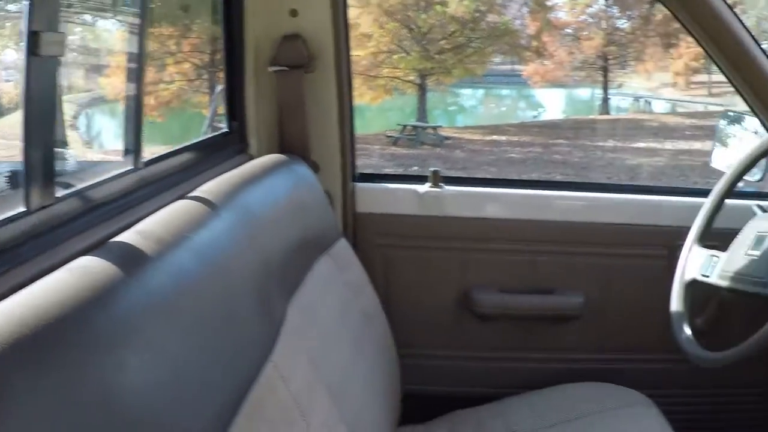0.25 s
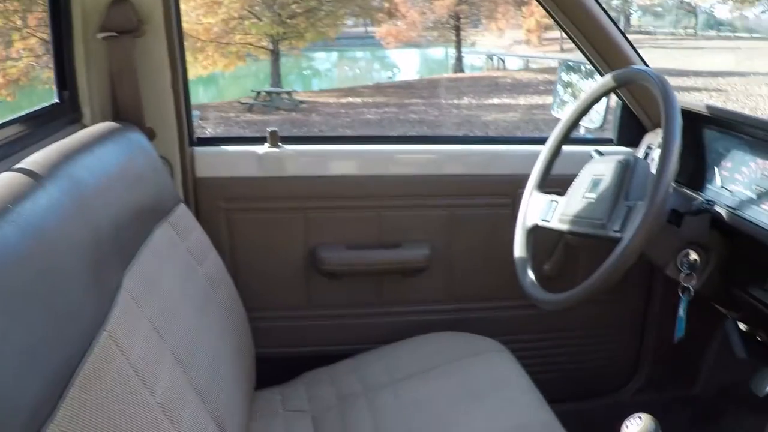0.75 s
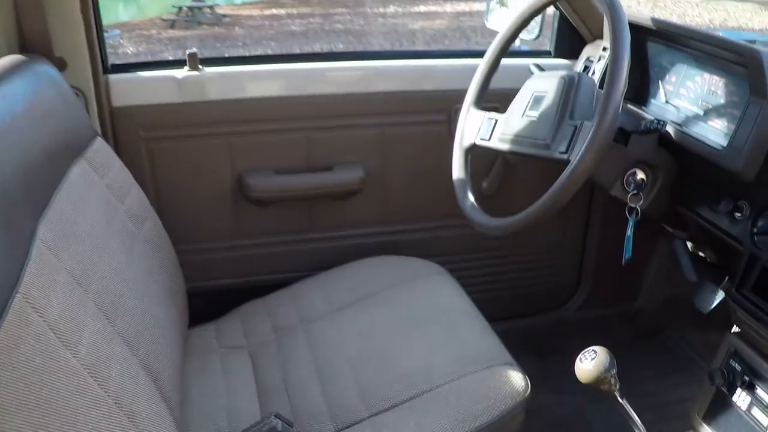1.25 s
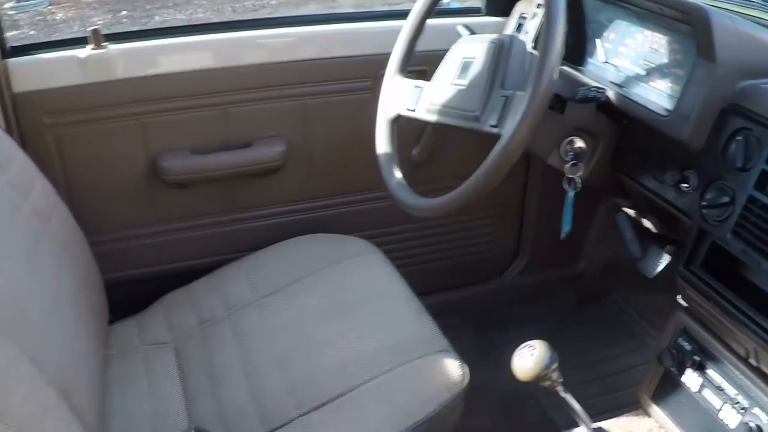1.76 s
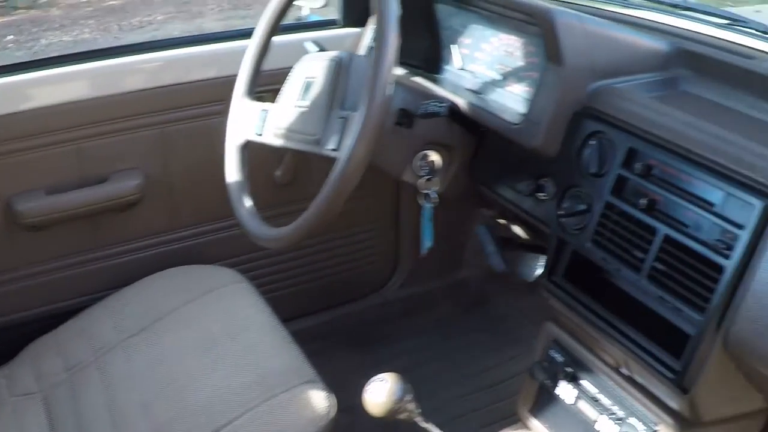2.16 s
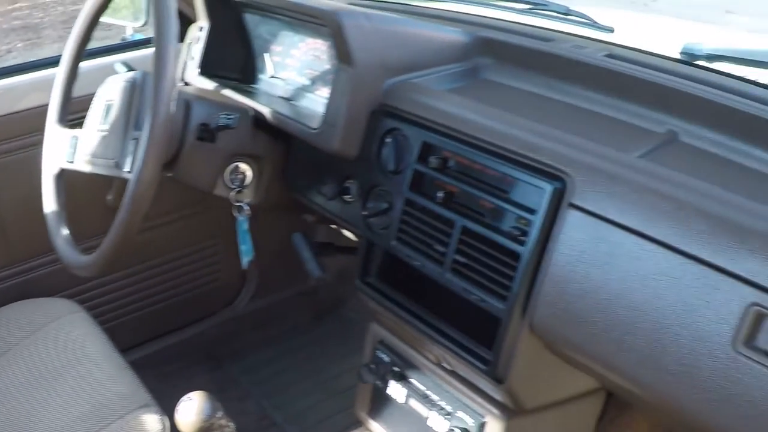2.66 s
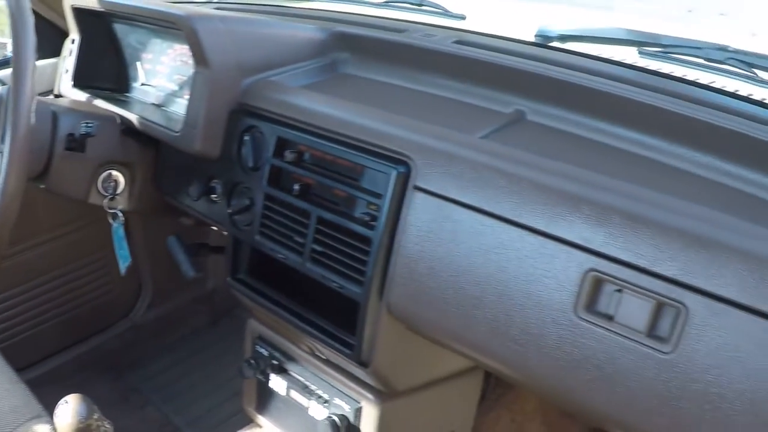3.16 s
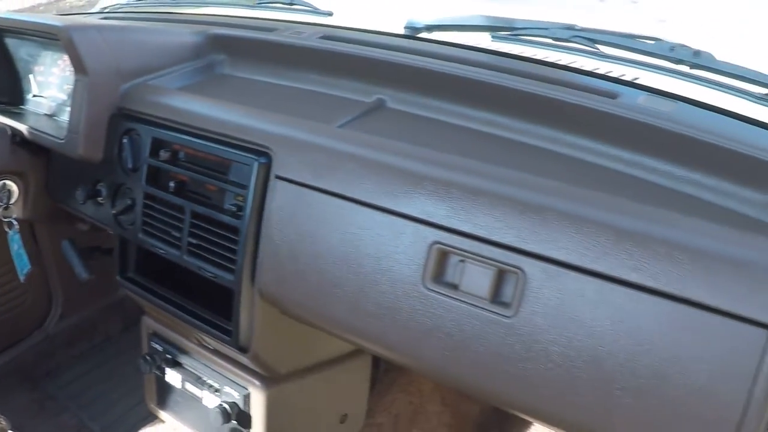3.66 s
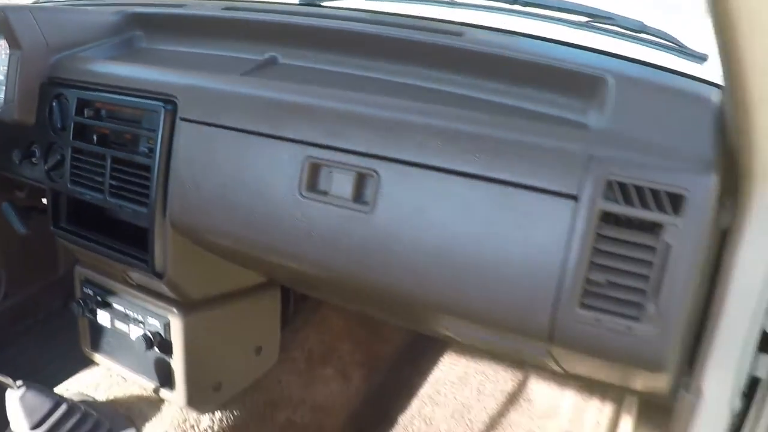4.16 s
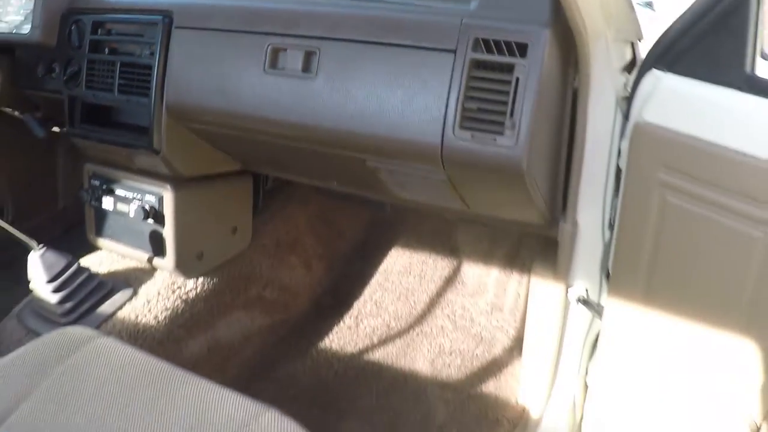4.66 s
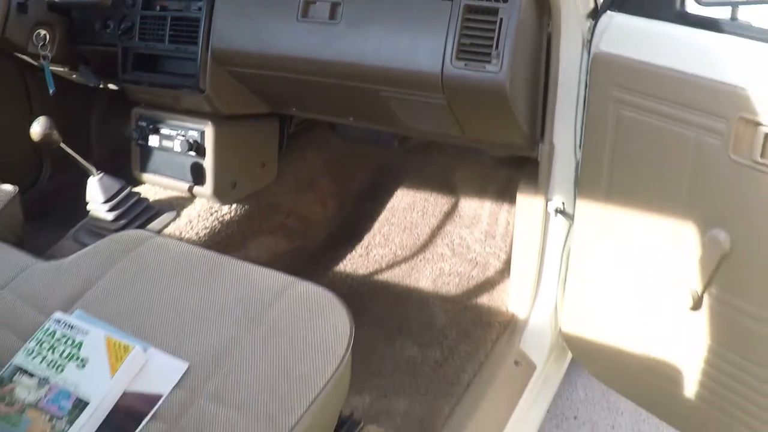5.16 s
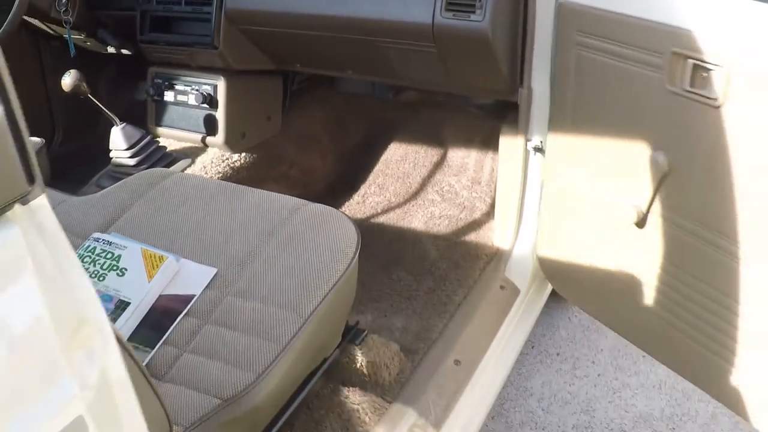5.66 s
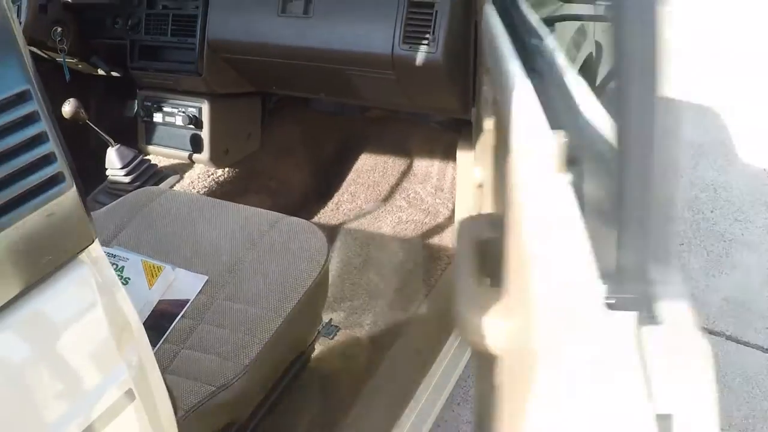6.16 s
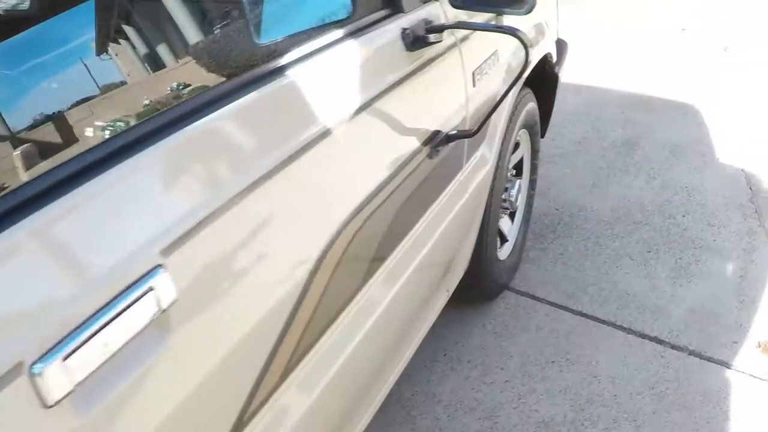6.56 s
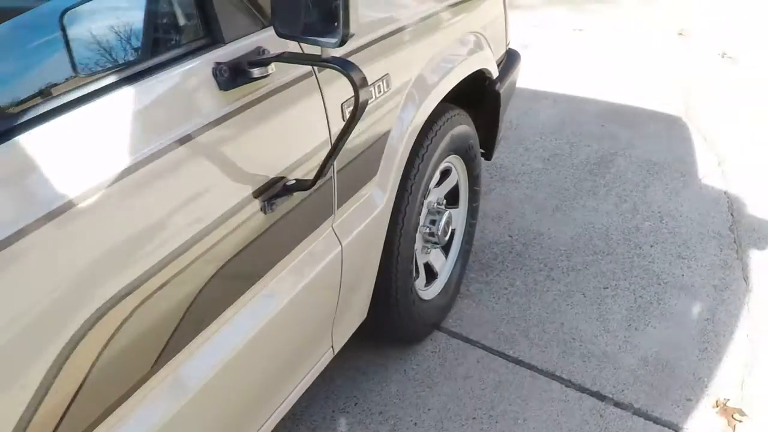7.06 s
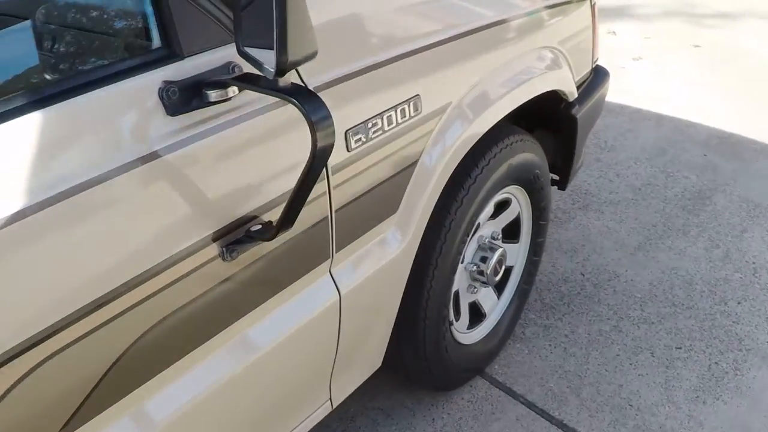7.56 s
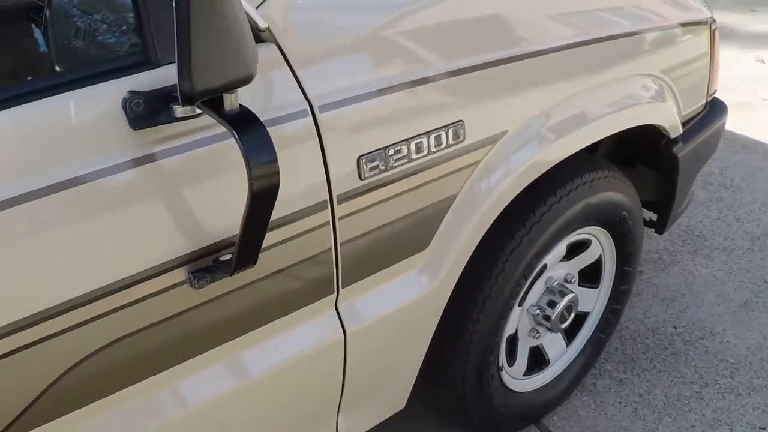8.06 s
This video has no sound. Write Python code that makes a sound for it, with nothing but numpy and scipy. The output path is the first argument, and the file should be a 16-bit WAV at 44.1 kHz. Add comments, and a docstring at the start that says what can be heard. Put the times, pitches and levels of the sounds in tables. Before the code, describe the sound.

Inside a small pickup's cab, a four-cylinder engine idles evenly with a deep droning boom and muted valve clatter. A couple of faint cloth scuffs pass. As the handheld microphone moves out the open door, wind thumps and crackles on it. The steel door slams with a sharp, loud bang and low thump; the sound ducks, then the idle returns outside, less boomy, with clearer ticking clatter.

```python
"""A four-cylinder pickup idles: its crank phase drives a firing note that booms in the open cab,
higher orders, block noise and valve clatter. Air buffets the microphone as it moves out past the seat:
noise follows the gusts, pulses mark swirls and eddies. A steel door slams in contact cracks, decaying
noise, short tones and a thump. The bang turns the gain down; it recovers on the idle by the front wheel."""
import sys
import numpy as np
from scipy import signal
from scipy.fft import rfft, irfft, next_fast_len
from scipy.io import wavfile
from scipy.ndimage import uniform_filter1d, minimum_filter1d, map_coordinates

SR = 44100
rng = np.random.default_rng(int(sys.argv[2]) if len(sys.argv) > 2 else 0)


def unload_wav(signal):
    """Save mono or channel-first audio to the path in sys.argv[1] as 16-bit WAV at rate SR, clipped to [-1, 1]."""
    wavfile.write(
        sys.argv[1],
        SR,
        np.round(np.clip(np.atleast_2d(signal).T, -1, 1) * 32767).astype(np.int16),
    )


N = 366912

# the microphone's path out through the door to the front wheel: t/s, position (0 in the cab - 1 outside)
OUTSIDE = [(0, 0.053), (2.9, 0.034), (4.1, 0.31), (5, 0.63), (6.4, 0.68), (7.8, 0.97)]
# gusts on the microphone: start t/s, length/s, flow level/dB, stray eddy rate/(1/s)
GUSTS = [(5.199, .14, -14, 18), (5.52, .1, -17.5, 20), (5.645, 0.14, -17.5, 50), (5.81, .17, -17.5, 40),
         (6.03, .09, -19, 0), (6.209, .17, -14.5, 0), (6.788, .12, -23.5, 0), (7.09, .26, -27.5, 0),
         (7.755, .1, -25.5, 0), (8.09, .18, -28.5, 0)]
# the door closes the cab at SHUT_S; the cab's sound dies behind it over SEAL_S
SHUT_S, SEAL_S = 6.401, 0.19  # s


def amp(db):
    """Level: an amplitude ratio is ten to the power of a twentieth of the decibels."""
    return 10 ** (np.asarray(db) / 20)


def unit(x):
    """Normalization: a signal divided by its root mean square has rms 1."""
    return x / np.sqrt(np.mean(x ** 2) + 1e-20)


def along(points, hz):
    """Logarithmic frequency scale: (Hz, value) points are joined linearly in log frequency."""
    f, v = np.transpose(points)
    return np.interp(np.log(hz + 1), np.log(f + 1), v)


def curves(rows):
    """Linear interpolation: each column after the time gives one value per sample."""
    s, *cols = np.transpose(rows)
    return [np.interp(np.arange(N) / SR, s, c) for c in cols]


def ramp(s, length):
    """Linear transition: 0 until time s, rising to 1 over length seconds."""
    return np.clip((np.arange(N) / SR - s) / length, 0, 1)


def wobble(rate):
    """Band-limited fluctuation: a smooth curve runs through rate random knots a second."""
    coarse = np.arange(0, N + 64, 64)
    knots = rng.standard_normal(int(N * rate / SR) + 4)
    smooth = map_coordinates(knots, [coarse * rate / SR])
    return np.interp(np.arange(N), coarse, smooth)


def filtered(x, response):
    """Linear filtering: the spectrum is multiplied by a response of frequency."""
    m = next_fast_len(len(x) + 8192)
    return irfft(rfft(x, m) * response(np.fft.rfftfreq(m, 1 / SR)), m)[:len(x)]


def coloured(x, spectrum):
    """Spectral shaping: x is weighted by (Hz, dB) points and brought to rms 1."""
    return unit(filtered(x, lambda hz: amp(along(spectrum, hz))))


def band(count, centre_hz, width_hz):
    """Resonance: noise is weighted by a symmetric peak, width_hz wide at half amplitude, at rms 1."""
    def peak(hz):
        detuning = (hz - centre_hz ** 2 / (hz + 1)) / width_hz
        return 1 / (1 + detuning ** 2)

    return unit(filtered(rng.standard_normal(count), peak))


def add(track, s, sound):
    """Superposition: a sound is summed into the track at time s."""
    part = track[round(s * SR):][:len(sound)]
    part += sound[:len(part)]


def window_hiss():
    """Broadband noise: outdoor hiss at the rear window fades as the microphone turns to the dashboard."""
    # outdoor spectrum: f/Hz, relative level/dB
    hiss_spectrum = [(500, -31), (1500, 3.5), (5000, -4), (8000, -11.5), (12500, -14), (15300, -19)]
    start_db, fade_s = -53.5, 0.73
    fade = np.exp(-(np.arange(N) / SR / fade_s) ** 2)
    return amp(start_db) * fade * coloured(rng.standard_normal(N), hiss_spectrum)


def wind():
    """Turbulent pressure: noise on the microphone follows gusts that rise, hold and die over a breeze."""
    # buffeting spectrum: f/Hz, relative level/dB
    buffet_spectrum = [(10, -13.5), (25, 1), (50, 2.5), (100, -3), (170, -10.5), (260, -19.5), (450, -27.5),
                       (900, -63.5), (2500, -120)]
    breeze_db = -35  # light air at position 1, outside
    attack_s, release_s = 0.028, 0.03  # exponential time constants
    t = np.arange(N) / SR
    flow = amp(breeze_db) * curves(OUTSIDE)[0] ** 2
    for s, length, db, _ in GUSTS:
        early, late = np.maximum(s - t, 0), np.maximum(t - s - length, 0)
        gust = amp(db) * np.exp(-early / attack_s - late / release_s)
        flow = np.maximum(flow, gust)
    return flow * amp(2.05 * wobble(25)) * coloured(rng.standard_normal(N), buffet_spectrum)


def puffs():
    """Pressure pulse: each slow swirl gives one low thud with opposite-signed lobes before and after."""
    # slow swirls: t/s, peak level/dB
    swirls = [(5.219, -10), (5.252, -9), (5.601, -4), (5.637, -9), (5.760, -6.5), (6.251, -6), (6.352, -8)]
    pulse_s = 0.0048  # Gaussian time scale
    out = np.zeros(N)
    t = np.arange(-SR // 20, SR // 20) / SR
    u = (t / pulse_s) ** 2
    for s, db in swirls:
        add(out, s + t[0], amp(db) * (2 * u - 1) * np.exp(-u))
    return out


def eddy(db, wake_s):
    """Impulsive turbulence: a pressure jolt 5 ms in leads a decaying noise wake, scaled to peak at db."""
    # spectrum of an eddy peaking at 0 dB: f/Hz, relative level/dB
    eddy_spectrum = [(35, -19), (130, -1), (260, 2), (480, -5.5), (840, -15), (1200, -25), (1800, -39),
                     (3000, -55), (6000, -120)]
    jolt_db, db_per_octave = 20, 40  # jolt over wake; a stronger eddy is also brighter
    t = np.arange(SR // 16) / SR
    wake = rng.standard_normal(len(t)) * np.exp(-t / wake_s)
    jolt = rng.choice([-1, 1]) * amp(jolt_db) * (t == 0)
    pitch = 2 ** (db / db_per_octave)
    shifted = [(hz * pitch, level) for hz, level in eddy_spectrum]
    swirl = coloured(np.pad(jolt + wake, (SR // 200, 0)), shifted)
    return amp(db) * swirl / np.abs(swirl).max()


def eddies():
    """Intermittent turbulence: strong eddies break on the microphone, weak ones scatter through rough gusts."""
    # strongest eddies: t/s, peak level/dB, wake time constant/s
    strong_eddies = [(5.161, -16, .003), (5.263, -14, .003), (5.270, -6, .002), (5.301, 1, .006),
                     (5.317, -4.5, .003), (5.337, -5, 0.0055), (5.347, -8, 0.0065), (5.378, -10, .016),
                     (5.459, -20, .003), (5.513, -13.5, 0.011), (5.532, -10.5, .008), (5.546, -8.5, 0.0041),
                     (5.620, -14, .005), (5.645, -11.5, .005), (5.655, -5, 0.0055), (5.684, -8.5, 0.017),
                     (5.706, -6.5, 0.0087), (5.755, -10, .008), (5.773, -9, 0.0099), (5.810, -10, 0.0049),
                     (5.820, -7.5, 0.0093), (5.851, -5, .01), (5.868, -13, .004), (5.929, -8, 0.012),
                     (5.955, -6, .005), (5.978, -11, 0.0085)]
    stray_db, scatter_db, stray_wake_s = -17.5, 3, 0.009  # mean and scatter of the weak peaks
    out, breaks = np.zeros(N), list(strong_eddies)
    for s, length, _, rate in GUSTS:
        count = round(length * rate)
        for k in range(count):
            when = s + length * (k + rng.random()) / count
            breaks.append((when, stray_db + rng.normal(0, scatter_db), stray_wake_s))
    for s, db, wake_s in breaks:
        add(out, s - .005, eddy(db, wake_s))
    return out


def brushes():
    """Stick-slip friction: clothes and seat brush in short scuffs of grainy noise."""
    # scuffs: t/s, level before the envelope/dB, centre f/Hz, bandwidth/Hz, Gaussian time scale/s
    scuffs = [(.49, -44, 1000, 600, .014), (.495, -43, 2900, 1800, .019), (1.943, -37, 720, 400, .006),
              (1.949, -45.5, 3100, 1300, .011), (1.97, -50, 3400, 900, .013),
              (5.205, -44, 2800, 1700, .014), (6.1, -51.5, 4300, 2600, .016),
              (6.235, -59, 11000, 5500, .028)]
    slip_db, slips_per_s = 2.5, 500  # graininess
    out = np.zeros(N)
    t = np.arange(-SR // 10, SR // 10) / SR
    for s, db, centre_hz, width_hz, length in scuffs:
        slips = amp(slip_db * np.tanh(wobble(slips_per_s)[:len(t)]))
        cloth = unit(slips * band(len(t), centre_hz, width_hz))
        add(out, s + t[0], amp(db) * cloth * np.exp(-(t / length) ** 2))
    return out


def door():
    """Impact and decay: steel contacts crack, short tones colour the slam, trapped air thumps, the door settles."""
    # latch, striker and frame contacts: t/s, crack level/dB, clash level/dB, peak tone level/dB
    contacts = [(6.3864, -3.5, -5, -19), (6.3995, -7.5, -4, -16), (6.4083, -14, -12, -25),
                (6.4225, -11, -11, -25), (6.446, -25, -26, -33), (6.4665, -29, -30, -37)]
    # spectrum of the clash: f/Hz, relative level/dB
    clash_spectrum = [(40, -12), (110, 4), (250, 6), (450, -2), (850, -3), (1450, -3), (2100, -10.5),
                      (2700, -12), (3700, -12.5), (5500, -22), (8000, -28.5), (12000, -36.5), (15300, -45)]
    # spectrum of steel on steel: f/Hz, relative level/dB
    crack_spectrum = [(300, -10), (1000, 4), (2200, -4), (3500, 0.5), (5000, -14), (8000, -21.5),
                      (12000, -28), (15300, -37.5)]
    # uneven spectral peaks of the slam's noise burst: f/Hz, relative level/dB
    slam_peaks = [(242, -9), (522, -7), (791, 1.5), (843, 2.5), (964, -5), (1193, -4.5), (1288, 0),
                  (1448, -6.5), (1572, -9), (1695, -9), (1960, -12), (2289, -11.5), (2427, -10.5),
                  (2635, -13), (2843, -12), (2993, -13.5), (3185, -15), (3478, -11), (3862, -10),
                  (5270, -20)]
    # decay of the clash: f/Hz, t60/s
    decay_times = [(200, 0.28), (700, 0.09), (2000, 0.115), (6000, 0.1), (14000, 0.14)]
    # the door drops back on its latch and bounces on the rubber seal: t/s, relative level/dB
    seal_bounces = [(6.482, 1.5), (6.494, -7), (6.505, -11)]
    # tones of each bounce's dull knock: f/Hz, relative level/dB, t60/s
    knock_tones = [(203, -5.5, 0.06), (284, -3, 0.045), (386, -7.5, 0.04), (497, -5, 0.035),
                   (590, -11, 0.04), (722, -15, 0.04), (915, -18, .03), (1240, -15, 0.021)]
    crack_s = 0.0014  # Gaussian time scale of one contact
    rattle_db, rattles_per_s = 3, 450  # loose parts chatter inside the door
    tones_longer = 1.27  # the peaks' t60 over the clash's
    thump_db, thump_hz, thump_t60 = 5.5, 40.1, 0.37  # the air trapped in the cab
    bend_hz, bend_s = 220, .0035  # the thump starts this much higher; time constant of the fall
    out = np.zeros(N)
    t = np.arange(SR // 2) / SR

    def tone(hz, db, t60):
        level_db = db + rng.normal(0, 1.5) - 60 * t / t60
        return amp(level_db) * np.sin(2 * np.pi * (hz * t + rng.random()))

    for s, crack_db, clash_db, tones_db in contacts:
        # each frequency of the clash dies at its own rate
        hz, when, z = signal.stft(coloured(rng.standard_normal(len(t)), clash_spectrum), SR, nperseg=128)
        decay = amp(-60 * when / along(decay_times, hz)[:, None])
        clash = signal.istft(z * decay, SR, nperseg=128)[1][:len(t)]
        rattle = amp(rattle_db * wobble(rattles_per_s)[:len(t)])
        crack = coloured(rng.standard_normal(len(t)), crack_spectrum) * np.exp(-(t / crack_s) ** 2)
        tones = sum(tone(f, db, tones_longer * along(decay_times, f)) for f, db in slam_peaks)
        contact = amp(crack_db) * crack + amp(clash_db) * clash * rattle + amp(tones_db) * tones
        add(out, s, contact * (1 - np.exp(-t / 0.00021)))
    cycles = thump_hz * t + bend_hz * bend_s * (1 - np.exp(-t / bend_s))
    thump = -amp(thump_db - 60 * t / thump_t60) * np.sin(2 * np.pi * cycles)
    add(out, SHUT_S, thump * (1 - np.exp(-t / 0.0005)))
    for s, db in seal_bounces:
        knock = sum(tone(*row) for row in knock_tones)
        add(out, s, amp(db) * knock * (1 - np.exp(-(t / 0.0017) ** 2)))
    return out


def crank():
    """Phase is the integral of frequency: the wavering firing rate accumulates to a count of firings."""
    # idle speed before the random waver: t/s, firing rate f/Hz
    idle_speed = [(0, 36.9), (.7, 36.3), (1.1, 37.1), (1.5, 37.3), (3.1, 37.4), (3.9, 36.8), (4.5, 37.2),
                  (6.4, 37.2), (6.9, 37.6), (7.4, 37.1), (8.3, 37.1)]
    return np.cumsum(curves(idle_speed)[0] * (1 + .003 * wobble(9))) / SR


def cab_air(firings):
    """Standing waves: the cab air hums on engine orders as the microphone drifts past nodes and antinodes."""
    # air resonances: f/Hz, bandwidth/Hz, multiple of the firing rate, hum's share of the power (0-1),
    # antinode level/dB, time at an antinode t/s, time between antinodes/s
    air_modes = [(275, 130, 7.75, .2, -47, 3.1, 3.2), (452, 80, 12.25, .4, -49, .2, 2.9),
                 (685, 120, 19, .33, -50.5, 2.4, 4.6)]
    waver_db, node_db = 3, -12  # random swell of the hums; a node's level against the antinode
    t, out = np.arange(N) / SR, np.zeros(N)
    for hz, width, multiple, share, db, antinode_s, spacing_s in air_modes:
        hum = unit(amp(waver_db * wobble(8)) * np.sin(2 * np.pi * multiple * firings))
        ringing = np.sqrt(share) * hum + np.sqrt(1 - share) * band(N, hz, width)
        standing = np.cos(np.pi * (t - antinode_s) / spacing_s)
        out += amp(db) * np.hypot(standing, amp(node_db)) * ringing
    return out * (1 - ramp(SHUT_S, SEAL_S))


def reflections(x, spread, wet_db):
    """Early reflections: close panels return dense echoes, decaying over spread s, that ripple the spectrum."""
    t = np.arange(SR // 16) / SR
    echoes = rng.standard_normal(len(t)) * np.exp(-t / spread)
    echoes = echoes / np.linalg.norm(echoes)
    wet = amp(wet_db)
    return (x + wet * signal.oaconvolve(x, echoes)[:N]) / np.hypot(1, wet)


def machinery(firings, repeat):
    """Cyclic noise: a share of the power repeats with each four-firing cycle, the rest is new."""
    cycle = rng.standard_normal(4800)
    same = unit(map_coordinates(cycle, [firings / 4 % 1 * len(cycle)], mode="wrap"))
    share = np.clip(repeat, 0, 1)
    return np.sqrt(share) * same + np.sqrt(1 - share) * rng.standard_normal(N)


def valve_taps(firings, life, scatter_db):
    """Periodic impact: two valves seat per firing, each of the eight with its own strength."""
    beat = 2 * firings
    which = beat.astype(int)
    own = np.resize(rng.standard_normal(8), 1024)
    size = amp(scatter_db * (own + rng.standard_normal(len(own))))
    return unit(size[which] * np.exp(-(beat % 1) / life))  # life is in taps


def engine(firings):
    """Harmonic orders and modulated noise share the crank's phase; the microphone's place sets levels."""
    # engine orders: multiple of the firing rate, cab rms level/dB, outside rms level/dB, before waver
    orders_db = [(2, -48.5, -30.5), (3, -45, -33), (4.5, -60, -41.5), (5.75, -62, -50), (7, -56, -57),
                 (11, -67, -50.5), (17.25, -60, -49), (19, -63, -49), (21.75, -69, -54), (29.75, -69, -56)]
    # block noise in the cab: f/Hz, relative level/dB
    cab_body = [(30, -120), (70, -4), (140, -1), (200, -5), (330, -5.5), (560, -8), (820, -10), (1000, -16),
                (1500, -24), (3000, -120)]
    # block noise outside: f/Hz, relative level/dB
    street_body = [(30, -120), (70, -2), (140, -2), (220, -8), (340, -6), (480, -7), (610, -3), (690, -4.5),
                   (820, -4.5), (1000, -12), (1500, -23), (3000, -120)]
    # valve clatter in the cab: f/Hz, relative level/dB
    cab_clatter = [(300, -120), (700, -13.5), (1050, -1), (1400, -0.5), (1800, -2), (2600, -6),
                   (3400, -10.5), (4200, -15), (5500, -18), (7000, -24), (9000, -27), (12500, -30),
                   (15300, -37.5)]
    # valve clatter outside: f/Hz, relative level/dB
    street_clatter = [(300, -120), (700, -12.5), (1050, 0), (1600, -0.5), (2100, -3), (3600, -8.5),
                      (4300, -12), (5500, -19), (7000, -24), (9000, -25), (10500, -33), (15300, -41.5)]
    # low rumble: f/Hz, relative level/dB
    rumble_spectrum = [(8, -11), (18, 1), (30, 8.5), (55, -6.5), (100, -14), (160, -16), (260, -42),
                       (600, -120)]
    outside = np.clip(curves(OUTSIDE)[0], 0, 1)
    blend = outside ** 1.8  # colour changes later along the path than level

    def heard(x, cab, street):
        return unit((1 - blend) * coloured(x, cab) + blend * coloured(x, street))

    def tone(multiple):
        return np.sqrt(2) * np.sin(2 * np.pi * multiple * firings)  # rms 1

    # the boom fades along the way, drops in the doorway and again behind the shut door
    doorway_s, doorway_length_s = 5.17, 0.55
    boom_db = -11.5 - 4.5 * outside - 7.5 * ramp(doorway_s, doorway_length_s) - 7.5 * ramp(SHUT_S, SEAL_S)
    # the two cylinder pairs push unequally, so the boom alternates in size
    boom = amp(boom_db) * (1 + .04 * np.cos(np.pi * firings)) * tone(1)
    orders = np.zeros(N)
    for multiple, cab, street in orders_db:
        order_db = cab + outside * (street - cab) + 1.67 * wobble(6)
        orders += amp(order_db) * tone(multiple)
    # the block breathes noise at every firing
    throb = 1 + 0.095 * np.cos(2 * np.pi * firings)
    body_db = -42.5 + 6.5 * outside + 0.44 * wobble(14)
    body = amp(body_db) * heard(machinery(firings, repeat=0.34) * throb, cab_body, street_body)
    # the valves add sharp taps
    taps = 5.5 + 0.35 * valve_taps(firings, life=0.51, scatter_db=6.0)
    clatter_db = -48.5 + 7 * outside + 0.34 * wobble(12)
    clatter = amp(clatter_db) * heard(machinery(firings, repeat=0.31) * taps, cab_clatter, street_clatter)
    clatter = reflections(clatter, spread=0.013, wet_db=-16)
    # one loose tappet ticks once a cycle of four firings
    tick_noise = coloured(rng.standard_normal(N), [(2000, -30.5), (6000, -5.5), (12000, -3), (15000, -4)])
    tick = amp(-65 + 2.5 * wobble(9)) * np.exp(-(firings % 4) / 0.53) * tick_noise
    rumble = amp(-34.0 - 3.4 * blend) * coloured(rng.standard_normal(N), rumble_spectrum)
    return boom + orders + rumble + body + clatter + tick


def scene():
    """Superposition: the pressures of all sources add at the one microphone."""
    firings = crank()
    air = window_hiss() + wind() + puffs() + eddies()
    return (air + brushes() + door() + cab_air(firings) + engine(firings))[None]


def gain_control(x, limit_db, attack, hold, recover_db):
    """Limiting: peaks over the limit turn the gain down; it holds, then climbs recover_db a second."""
    wanted = np.minimum(0, limit_db - 20 * np.log10(np.abs(x) + 1e-9))
    size = int(hold * SR) // 2 * 2 + 1
    held = minimum_filter1d(wanted, size, origin=size // 2, mode="nearest")
    climb = recover_db * np.arange(N) / SR
    gain_db = np.minimum.accumulate(held - climb) + climb
    return x * amp(uniform_filter1d(gain_db, int(attack * SR) + 1))


def record(dry):
    """Nonlinear transfer: gain control and soft clipping bound the peaks, then a low-pass limits the band."""
    x = gain_control(dry[0], limit_db=0.8, attack=0.0049, hold=0.35, recover_db=11)
    x = x / (1 + np.abs(x / .96) ** 8) ** (1 / 8)
    return filtered(x, lambda hz: hz < 15300)[None]


dry = scene()
out = record(dry)
unload_wav(out)
```